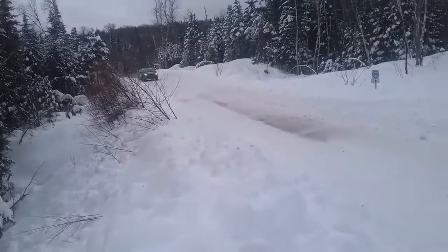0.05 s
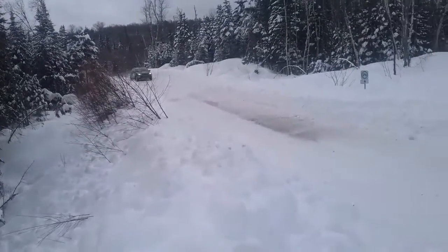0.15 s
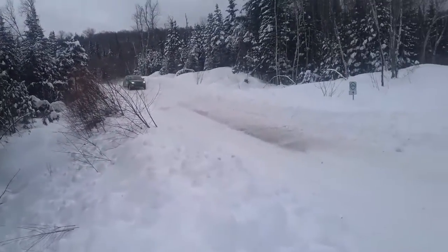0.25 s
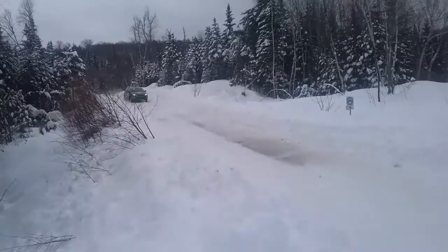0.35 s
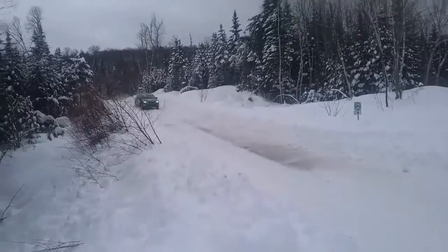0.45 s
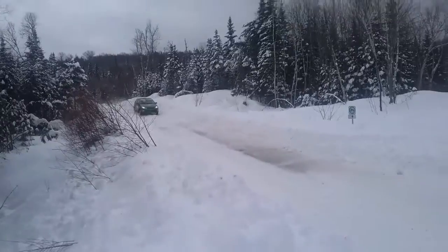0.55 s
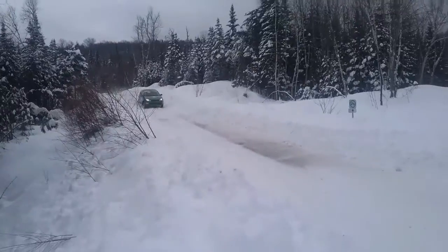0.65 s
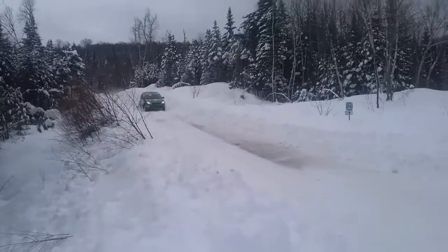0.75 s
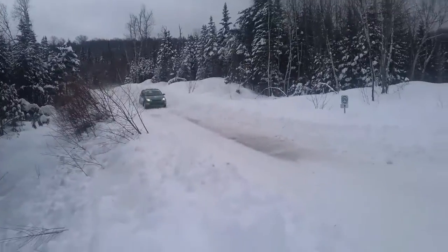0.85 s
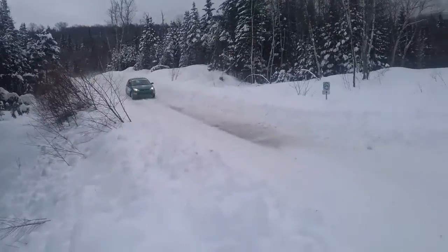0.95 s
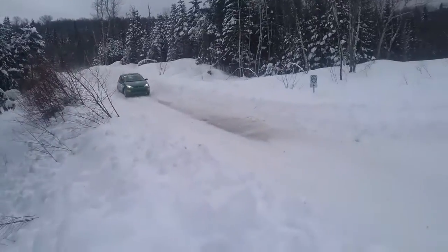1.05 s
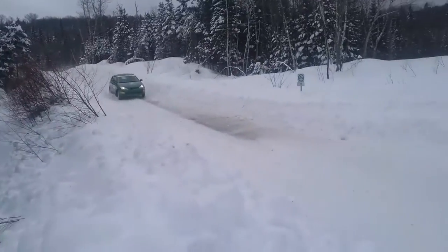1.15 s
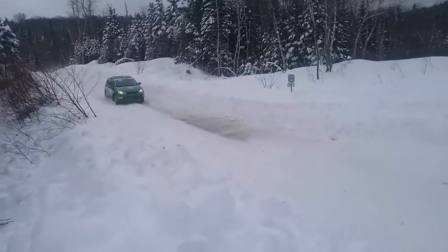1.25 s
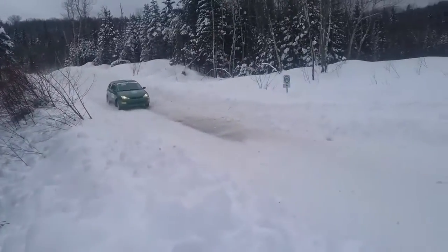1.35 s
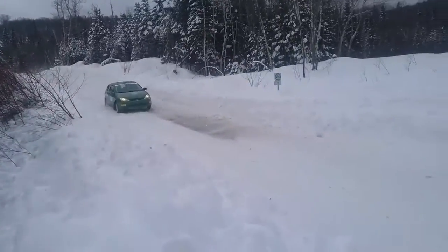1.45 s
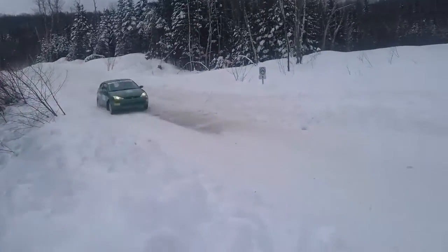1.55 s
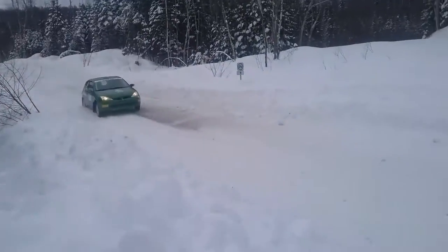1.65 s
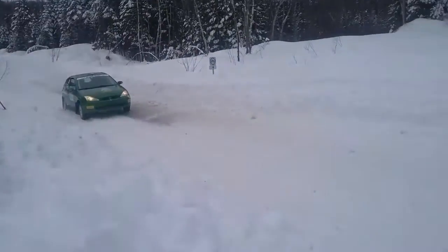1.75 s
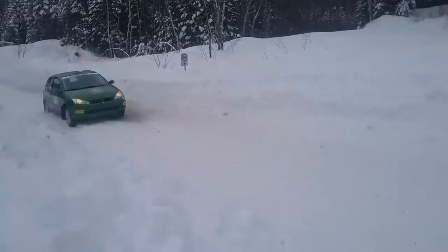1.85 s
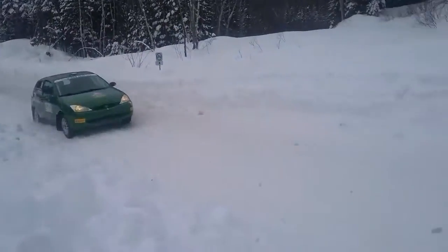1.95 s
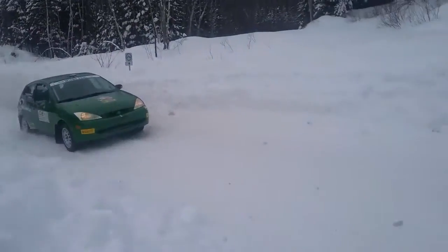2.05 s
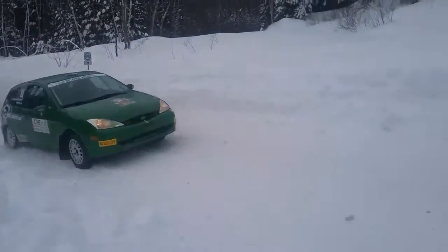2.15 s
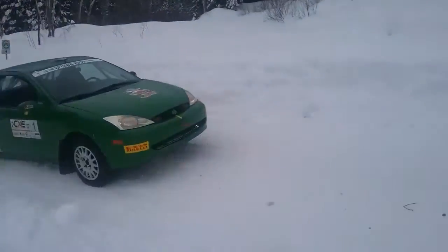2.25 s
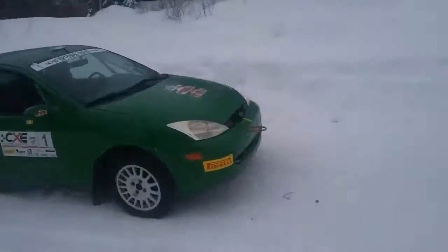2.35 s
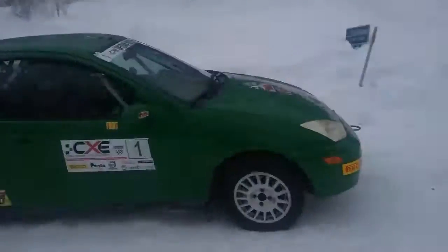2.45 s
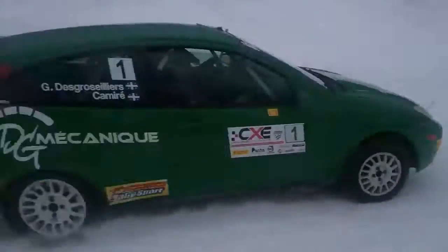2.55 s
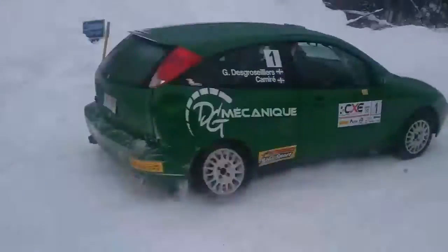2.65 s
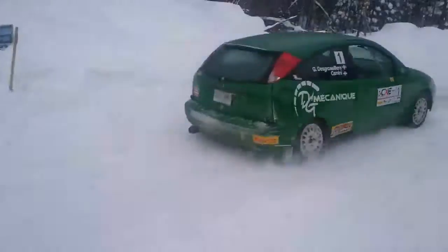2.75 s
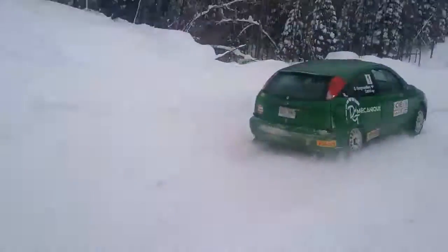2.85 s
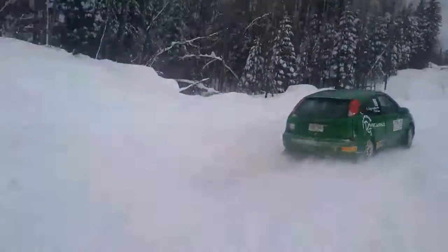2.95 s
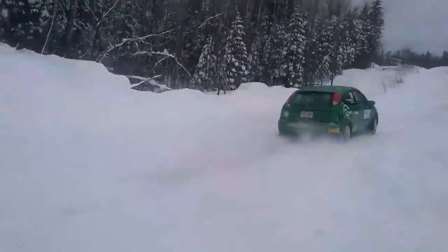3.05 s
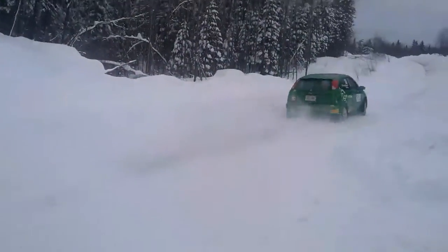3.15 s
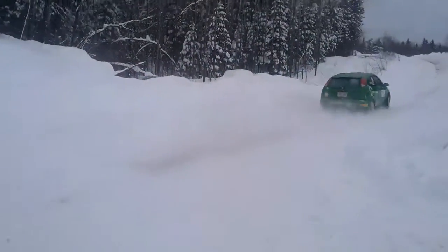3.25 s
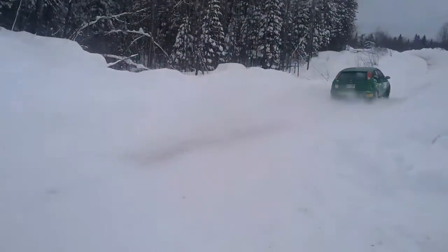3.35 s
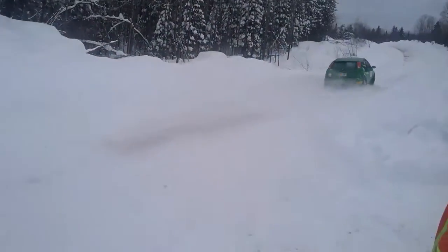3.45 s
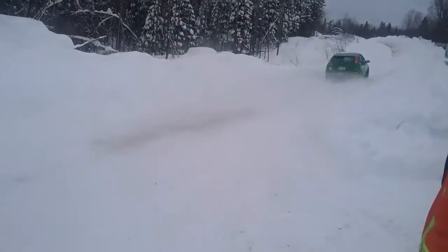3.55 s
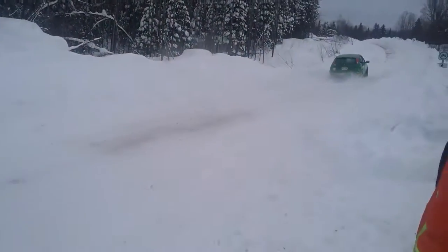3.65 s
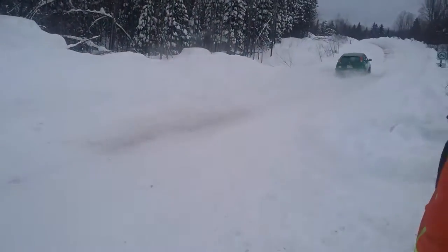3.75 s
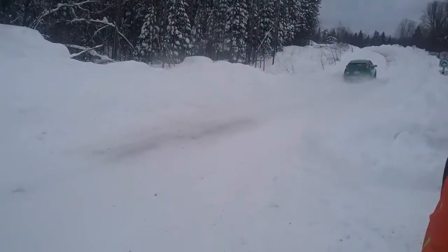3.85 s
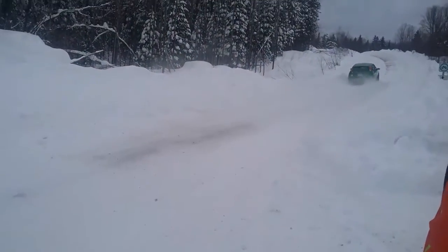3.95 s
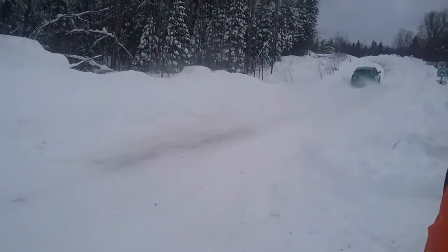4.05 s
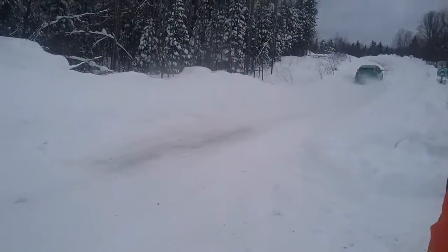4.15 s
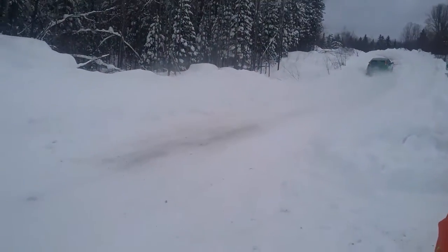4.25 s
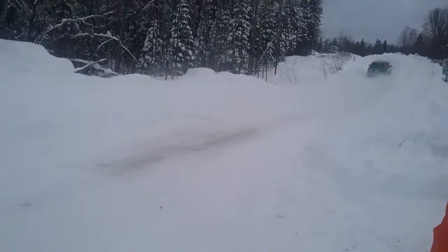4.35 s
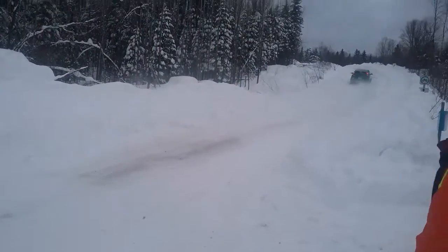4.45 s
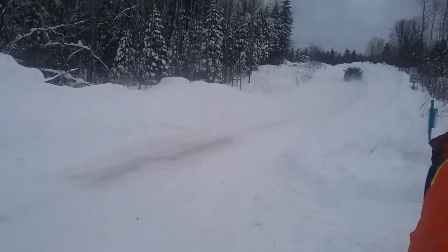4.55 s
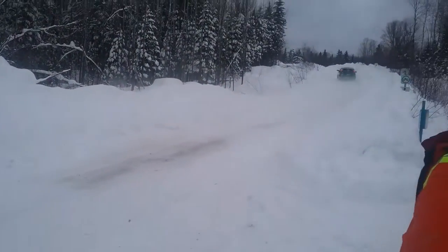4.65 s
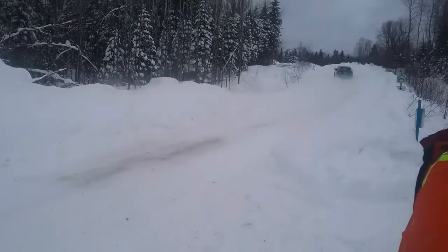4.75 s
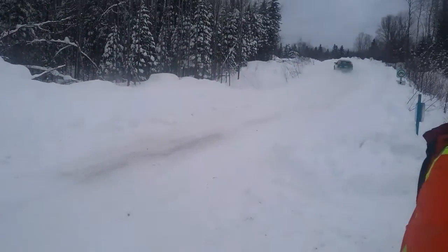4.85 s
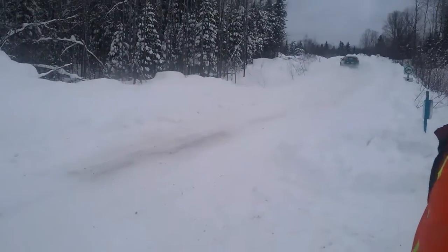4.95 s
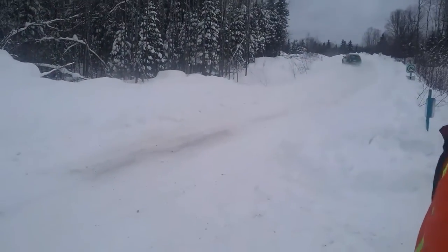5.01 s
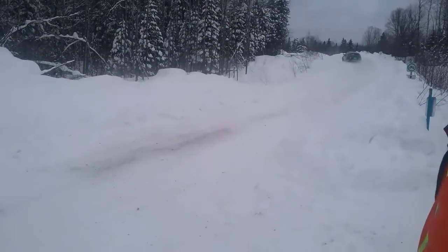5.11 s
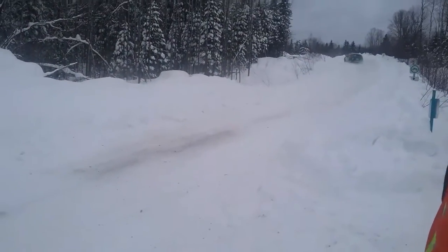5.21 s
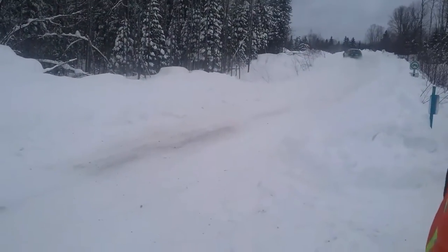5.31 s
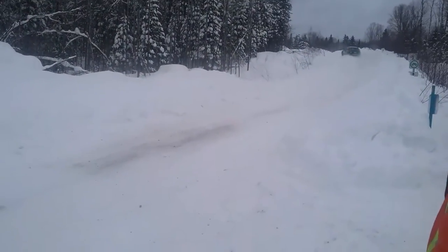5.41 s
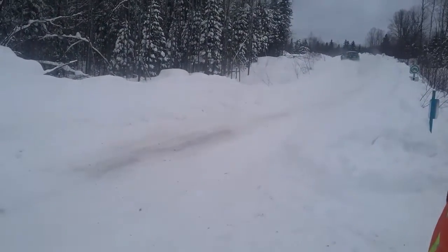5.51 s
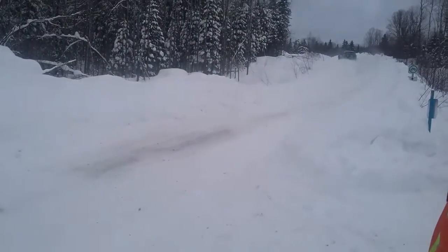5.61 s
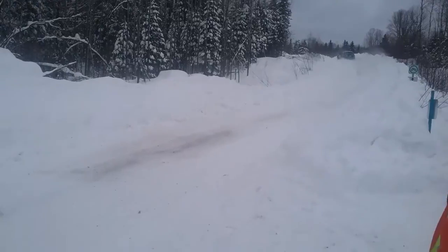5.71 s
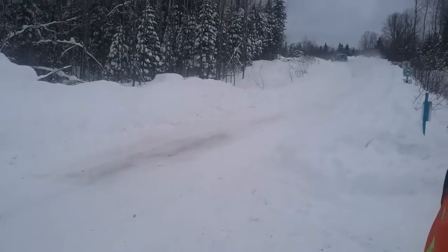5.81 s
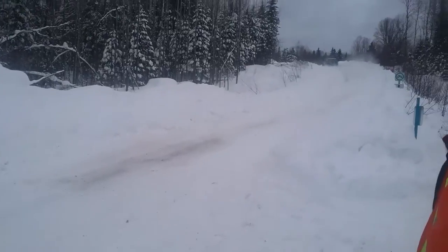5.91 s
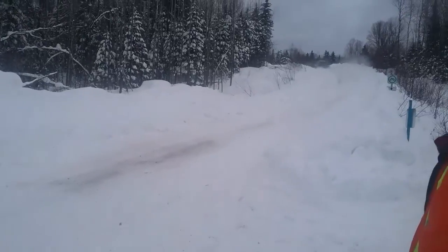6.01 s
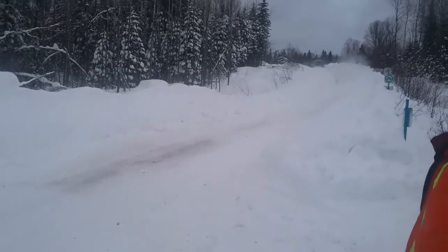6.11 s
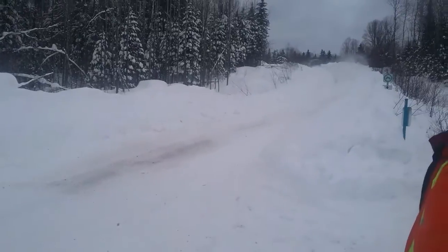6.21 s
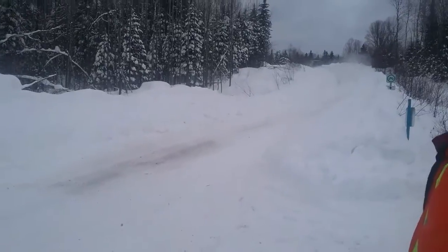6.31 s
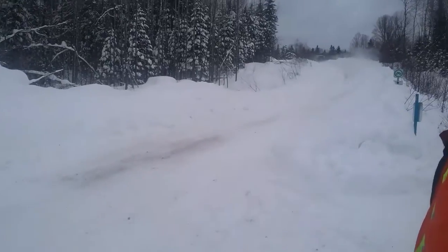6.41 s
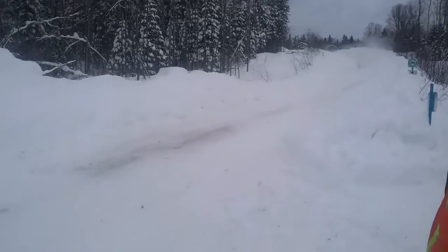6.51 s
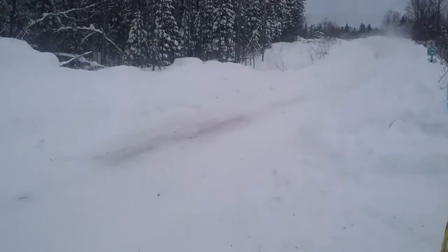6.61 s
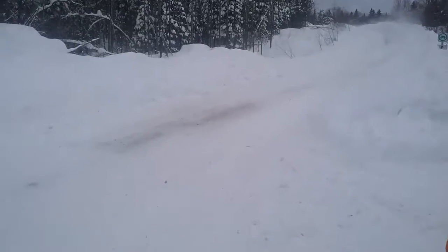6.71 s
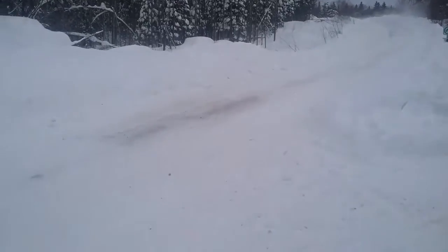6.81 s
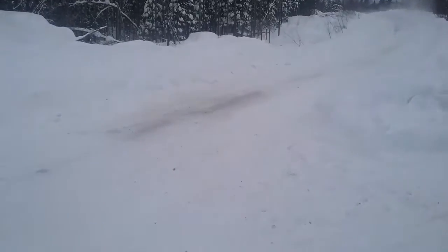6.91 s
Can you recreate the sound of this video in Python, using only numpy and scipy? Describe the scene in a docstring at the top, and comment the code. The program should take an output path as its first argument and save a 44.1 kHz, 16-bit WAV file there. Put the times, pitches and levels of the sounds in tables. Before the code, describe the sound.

A hard-revving rally engine grows from a steady drone to a loud close pass over snow, with hissing tyres, flung slush and low rumble. Its raspy exhaust then leads away down the road, thinning with distance; the throttle drops, opens again, drops and just begins to return. Faint forest air and a short echo from trees and banks, captured by a simple handheld mono microphone.

```python
"""A four-cylinder rally car comes flat out along a snowy forest road, its intake drone and churning tyres leading.
A tick with a dull thump falls early on; slush spatters just before the car passes a few metres away at about 2.6 s.
Then the exhaust barks and rasps, thin bright clicks crackle at its loudest, and the low rumble falls with the wake.
Far off the driver lifts, opens the throttle again, lifts once more and starts to open it at the very end.
Firing pulses ring through filters as exhaust, a swayed sine is the intake, shaped noise is snow, rumble and air."""
import sys
import numpy as np
from scipy import signal
from scipy.fft import rfft, irfft, next_fast_len
from scipy.io import wavfile
from scipy.ndimage import uniform_filter1d, map_coordinates

SR = 44100
rng = np.random.default_rng(int(sys.argv[2]) if len(sys.argv) > 2 else 0)


def store_pcm(level_fs):
    """Save levels as 16-bit WAV."""
    pcm = np.round(np.clip(level_fs, -1, 1) * 32767).astype(np.int16)
    wavfile.write(sys.argv[1], SR, np.atleast_2d(pcm).T)


N = 307377
TIME = np.arange(N) / SR


def from_db(db):
    """Decibels to gain."""
    return 10 ** (np.asarray(db) / 20)


def rms_one(x):
    """Scale to unit power."""
    return x / np.sqrt(np.mean(x ** 2) + 1e-20)


def in_time(rows):
    """Each column of a curve, interpolated at every sample."""
    time_s, *columns = np.transpose(rows)
    return [np.interp(TIME, time_s, column) for column in columns]


def drift(rate):
    """Smooth random wander of spread 1, with the given number of random knots per second."""
    knots = rng.standard_normal(8000)
    coarse_s = TIME[::16]
    wander = map_coordinates(knots, [coarse_s * rate + 5], order=3, mode="wrap")
    return rms_one(np.interp(TIME, coarse_s, wander))


def wavering(level_db, waver_db, per_s=14):
    """Gain that wavers a little as the car bucks and slews."""
    return from_db(level_db + waver_db * drift(per_s))


def white_noise():
    """Gaussian noise, equally strong at all pitches."""
    return rng.standard_normal(N)


def coloured(x, spectrum, size=4096):
    """Causal (minimum-phase) filter with the given spectrum: its peaks ring after each pulse."""
    hz, db = np.transpose(spectrum)
    grid_hz = np.maximum(np.fft.rfftfreq(size, 1 / SR), 1)
    gain = from_db(np.interp(np.log(grid_hz), np.log(hz), db))
    # folding the cepstrum onto positive time makes the filter minimum-phase
    cepstrum = irfft(np.log(gain))
    cepstrum[1:size // 2] *= 2
    cepstrum[size // 2 + 1:] = 0
    impulse_response = irfft(np.exp(rfft(cepstrum)))
    return signal.fftconvolve(x, impulse_response)[:N]


def band(x, low_hz, high_hz, order=24):
    """A steep zero-phase band; bands that share an edge add up to the whole."""
    size = next_fast_len(N + 4096)
    hz = np.fft.rfftfreq(size, 1 / SR)
    below_high = 1 / (1 + (hz / high_hz) ** order)
    below_low = 1 / (1 + (hz / low_hz) ** order)
    return irfft(rfft(x, size) * (below_high - below_low), size)[:N]


def high_passed(x, order, low_hz):
    """Keep what lies above low_hz."""
    return signal.sosfilt(signal.butter(order, low_hz, "high", fs=SR, output="sos"), x)


def evened(x, size=2200):
    """Hold the running power at 1 over windows of size samples."""
    return x / np.sqrt(np.maximum(uniform_filter1d(x ** 2, size), 1e-14))


def clicks_at(events):
    """One click of the given height for each event."""
    clicks = np.zeros(N)
    for start_s, db in events:
        clicks[round(start_s * SR)] = from_db(db)
    return clicks


# how hard the engine works, before each part takes its share: time_s, throttle_db
THROTTLE = [(0, -6.5), (.42, -4.4), (1.2, -3), (1.94, .3), (3.53, -.6), (3.89, -6), (4.23, -10),
            (4.47, -16.5), (4.81, -29.5), (4.88, -3.5), (5.08, 1.9), (5.88, 1.5), (6.31, -5.6),
            (6.59, -19.3), (6.76, -26.6), (6.89, -24), (6.97, -8)]
# how each part follows distance, heading and throttle; name: abeam_db (before throttle and swells),
# loss_db per doubling of distance, rear_db (gain to the rear, loss ahead), throttle_share,
# smoothing_s (averaging of the throttle), abeam_s (moment of passing).
# "snow" is relative to the hiss, "echo" to the direct sound, "uneven" scales the firing differences
PARTS = {"drone": (-7.3, 5.5, -3.4, .88, .02, 2.62), "octave": (-27.8, 1.6, 1.9, 1.0, .02, 2.25),
         "bark": (-16.6, 3.3, 2.5, 1.02, .2, 2.6), "rasp": (-22.0, 3.1, -.6, 1.27, .01, 2.72),
         "hiss": (-18.4, 6.3, 1.0, 1.23, .01, 2.74), "rumble": (-32.0, 5.7, -.5, .1, .02, 2.3),
         "snow": (-9.6, -2.5, -4.5, -.2, .02, 2.68), "echo": (-21.0, -5.2, -8.0, -.15, .02, 2.6),
         "uneven": (-2.4, .1, -3.3, .02, .02, 2.45)}
# bell-shaped swells and dips of single parts; name: centre_s, half_length_s, swell_db
SWELLS = {"drone": [(1.38, .036, -8), (1.56, .035, -6), (1.66, .13, -12.5), (2.37, .06, 3),
          (2.5, .02, -6.8), (2.74, .09, -6.6), (4.99, .075, 4.3), (5.95, .37, -7)],
          "octave": [(1.6, .44, -7), (2.42, .015, -12), (2.55, .11, 11), (2.84, .03, -12), (2.93, .05, 7),
          (6.53, .16, 11.4)], "bark": [(1.45, .08, 5.5), (1.76, .11, -4.5), (2.11, .13, 4.2),
          (2.41, .025, -6), (2.72, .035, -5.8), (3.35, .17, 2), (3.92, .1, -3), (4.66, .1, 8.5),
          (6.15, .13, 2.5), (6.52, .08, -4)], "rasp": [(2.55, .08, -3), (2.88, .025, -6), (3.26, .03, -3),
          (3.9, .047, -6), (4.0, .025, 3), (4.24, .04, 3), (4.58, .18, 10.4), (5.9, .2, 2), (6.9, .12, -6),
          (4.88, .025, 4)], "hiss": [(2.58, .045, -8), (2.81, .05, 2.5), (3.28, .03, -3), (3.35, .015, 3),
          (3.43, .025, -3), (3.5, .026, 4.5), (3.94, .015, 4), (4.15, .12, 2), (4.62, .12, -9),
          (4.82, .02, -7), (6.55, .2, -5.5)], "rumble": [(2.8, .05, 8), (3.09, .04, 10), (5.03, .05, 15),
          (6.3, .04, 13)], "snow": [(3.3, .5, -3.5), (4.9, .05, -3), (5.5, .35, 2)],
          "echo": [(3.35, .45, -10), (4.9, .05, -15), (5.15, .15, 4)], "uneven": [(1.2, .1, 2),
          (1.43, .06, -4), (1.75, .2, 2), (2.62, .05, -4), (3.5, .4, -1.5), (5.25, .25, -3)]}
SPEED_M_PER_S, CLOSEST_M = 20.0, 4.0   # a straight run past the listener


def level_of(part):
    """Level in dB of one part as the car drives past: distance, heading, throttle and swells add up."""
    abeam_db, loss_db, rear_db, throttle_share, smoothing_s, abeam_s = PARTS[part]
    coarse_s = TIME[::64]
    along_m = SPEED_M_PER_S * (coarse_s - abeam_s)
    distance_m = np.hypot(along_m, CLOSEST_M)
    heading_db = rear_db * along_m / distance_m
    distance_db = -loss_db * np.log2(distance_m / CLOSEST_M)
    throttle_db = np.interp(coarse_s, *np.transpose(THROTTLE))
    throttle_db = uniform_filter1d(throttle_db, size=1 + int(smoothing_s / coarse_s[1]))
    swell_db = sum(db * np.exp(-.5 * ((coarse_s - centre_s) / half_length_s) ** 2)
                   for centre_s, half_length_s, db in SWELLS[part])
    level_db = abeam_db + heading_db + distance_db + throttle_share * throttle_db + swell_db
    return np.interp(TIME, coarse_s, level_db)


# still forest: pitch_hz, relative_db
AIR_COLOUR = [(25, -32), (90, -12), (300, -4), (600, -7.5), (1100, -13.5), (3000, -24), (7000, -37),
              (15000, -20.5)]


def forest_air(level_db=-58):
    """The still forest: a faint, steady bed of shaped noise."""
    return from_db(level_db) * rms_one(coloured(white_noise(), AIR_COLOUR))


# tick and thump: start_s, relative_db
TICKS = [(0.4347, -37.5)]


def tick_and_thump(tick_db=16, thump_db=58, thump_hz=160):
    """A tiny click, and the same click through a low band as a dull thump."""
    clicks = clicks_at(TICKS)
    low_band = signal.butter(1, [thump_hz / 2, thump_hz], "band", fs=SR, output="sos")
    thump = signal.sosfilt(low_band, clicks + 1e-18)
    return from_db(tick_db) * clicks + from_db(thump_db) * thump


# wheels over ruts: pitch_hz, relative_db
RUMBLE_COLOUR = [(20, -39.5), (40, -17.5), (60, -4), (82, -1.5), (120, -10.5), (200, -12), (500, -40),
                 (2000, -81)]
WAKE_ENDS_S, WAKE_FADE_S, WAKE_DROP_DB = 3.15, .025, 11   # the rumble falls away once the wake has gone by


def rumble(firing_hz, lump_db=2.0, throb_db=-7):
    """Wheels thud over ruts as low noise; the crankshaft adds a throb at half the firing rate."""
    throb = np.sqrt(2) * np.sin(np.pi * np.cumsum(firing_hz) / SR + drift(12))
    thuds = rms_one(coloured(white_noise(), RUMBLE_COLOUR))
    wake_gone = .5 + .5 * np.tanh((TIME - WAKE_ENDS_S) / WAKE_FADE_S)
    level_db = level_of("rumble") - WAKE_DROP_DB * wake_gone + lump_db * drift(18)
    return from_db(level_db) * (thuds + from_db(throb_db) * throb)


# tyres in snow: pitch_hz, relative_db per Hz
SNOW_COLOUR = [(60, -11.5), (130, 8), (280, 3), (600, 12), (900, 9), (1500, 6), (2300, 5.5), (3500, 1.5),
               (5500, -1), (9000, -5), (15000, -2)]


def tyres(level_db, grains_per_s=900, grain_db=-6, churn_db=0.84):
    """Studded treads churn the snow as noise and fling icy grains, random clicks, at the wheel arches."""
    chance = grains_per_s * from_db(4 * drift(25)) / SR
    born = rng.random(N) < chance
    heavy_db = 1.5 * np.minimum(rng.exponential(1, N), 4)   # a few grains hit much harder
    grains = born * white_noise() * from_db(heavy_db)
    spray = coloured(white_noise() + from_db(grain_db) * rms_one(grains), SNOW_COLOUR)
    hiss_rms = np.std(band(spray, 3200, 7500))   # the level refers to this band
    return from_db(level_db + churn_db * drift(45)) * spray / hiss_rms


# slush flung by the wheels as they go by: centre_s, level_db, half_length_s
SLUSH = [(2.254, -16, 0.012), (2.39, -18, .009), (2.425, -19.5, 0.021), (2.498, -15, 0.02)]
# its colour: pitch_hz, relative_db per Hz
SLUSH_COLOUR = [(300, -16), (2000, -8), (5500, -4.5), (9000, 1), (15000, 0.5)]


def slush(clump_db=2.0):
    """Thrown snow: short, bright bursts of noise, made clumpy by a fast wander in level."""
    swell = sum(from_db(level_db) * np.exp(-.5 * ((TIME - centre_s) / half_length_s) ** 2)
                for centre_s, level_db, half_length_s in SLUSH)
    clumps = white_noise() * from_db(clump_db * drift(500))
    return swell * rms_one(coloured(clumps, SLUSH_COLOUR))


def forest_echo(x, t60_s=0.41, first_s=.004):
    """Trunks and snow banks scatter a short dense echo: convolution with decaying noise."""
    tail_s = TIME[:SR // 2]
    echo = rng.standard_normal(len(tail_s)) * from_db(-60 * tail_s / t60_s) * (tail_s > first_s)
    return signal.fftconvolve(x, echo / np.sqrt(np.sum(echo ** 2)))[:N]


# overload crackle while the car is loudest: start_s, relative_db
CRACKLES = [(2.915, 1), (2.941, -3), (2.946, 0), (2.9943, -2), (3.0066, 4), (3.013, 1), (3.0595, -1)]


def overload_crackle(gain_db=22.5, low_hz=8000):
    """Thin, bright clicks placed by the table, with only their top treble kept, as of an overdriven input."""
    return from_db(gain_db) * high_passed(clicks_at(CRACKLES), 4, low_hz)


# engine speed as heard; it flares as the wheels slip and drops as the car goes by: time_s, firings_per_s
REVS = [(0.0, 140.0), (0.13, 144.2), (0.25, 141.3), (0.39, 146.2), (0.62, 150.5), (0.79, 152.1),
        (0.85, 155.4), (0.93, 155.7), (1.03, 153.2), (1.16, 159.1), (1.3, 158.2), (1.36, 167.1),
        (1.4, 169.1), (1.46, 163.0), (1.49, 163.9), (1.53, 167.4), (1.76, 170.3), (1.82, 168.8),
        (2.27, 173.8), (2.31, 172.5), (2.45, 175.9), (2.52, 169.9), (2.58, 169.9), (2.64, 173.7),
        (2.68, 173.8), (2.77, 160.9), (2.91, 159.1), (3.11, 171.4), (3.2, 166.5), (3.67, 161.7),
        (3.71, 158.4), (3.78, 158.0), (4.04, 159.9), (4.21, 157.8), (4.29, 150.8), (4.5, 146.4),
        (4.76, 137.7), (5.3, 149.7), (5.49, 147.0), (5.61, 150.3), (6.0, 140.3), (6.19, 138.5),
        (6.76, 129.3), (6.97, 128.6)]


def revs(slip=.0016, slips_per_s=24):
    """Firing rate, trembling around its curve as the tyres grip and slip."""
    firing_hz, = in_time(REVS)
    return firing_hz * (1 + slip * drift(slips_per_s))


def intake(cycles, uneven_db, sway=.24, wander_db=2.0, flutter_db=0.47):
    """The firing tone, a sine; unequal cylinders sway its phase once in every four firings."""
    depth = sway * from_db(uneven_db + wander_db * drift(16))
    ripple = depth * np.sin(np.pi / 2 * cycles + drift(10))
    tone = np.sin(2 * np.pi * cycles + ripple)
    return -from_db(flutter_db * drift(40)) * tone


# four cylinders, never quite equal, before the "uneven" part scales them: strength_db, late_ms
CYLINDERS = [(-2.8, 0.044), (-7.2, -0.043), (-4.9, -0.082), (-4.5, 0.012)]


def firings(cycles, uneven, scatter_db=1.2, jitter_ms=.035):
    """One sharp pressure pulse each time an exhaust valve opens."""
    count = np.arange(1, int(cycles[-1]))
    at = np.interp(count, cycles, np.arange(N))
    chance = rng.standard_normal((len(count), 2))
    strength_db, late_ms = np.array(CYLINDERS)[count % len(CYLINDERS)].T
    spread = uneven[at.astype(int)]
    height = from_db(spread * (strength_db + scatter_db * chance[:, 0]))
    late = spread * (late_ms + jitter_ms * chance[:, 1])
    at = np.clip(at + late * SR / 1000, 0, N - 2)
    # a pulse between two samples is shared by both
    pulses, whole = np.zeros(N), at.astype(int)
    pulses[whole] = height * (1 - at % 1)
    pulses[whole + 1] = height * (at % 1)
    return pulses


def gas_jet(pulses, puff_s=0.0011, onset_hz=3500):
    """Each pulse drives a short turbulent puff of noise out of the pipe, mostly treble."""
    gate = signal.lfilter([1], [1, -np.exp(-1 / (puff_s * SR))], pulses)
    return high_passed(rms_one(gate * white_noise()), 1, onset_hz)


# silencer cavities that hold parts of each pulse back: pitch_hz, width_hz
CAVITIES = [(1100, 3600), (4000, 900), (6100, 1700)]


def dispersed(x):
    """All-pass cavities smear each pulse into a short chirp."""
    for pitch_hz, width_hz in CAVITIES:
        radius = np.exp(-np.pi * width_hz / SR)
        poles = [1, -2 * radius * np.cos(2 * np.pi * pitch_hz / SR), radius * radius]
        x = signal.lfilter(poles[::-1], poles, x)
    return x


# bounce off the car's body as the tail swings round: time_s, lag_ms (before the slewing wander), strength
BOUNCE = [(0, 0.07, .1), (2.5, 0.043, 0.6), (2.7, 0.19, 0.16), (2.85, 0.16, 0.56), (3.0, 0.34, 0.2),
          (3.2, .39, .5), (3.7, 0.44, 0.27), (6.97, 0.49, .35)]
# later return from the snow bank: time_s, lag_ms (before the slewing wander), strength
BANK = [(0, 1.72, 0.27), (2.4, 2.32, 0.082), (3.0, 2.2, .15), (3.8, 2.05, 0.6), (4.4, 2.05, 0.2),
        (5.0, 2, 0.37), (5.9, 1.78, 0.36), (6.97, 2.04, 0.42)]


def bounced(x, slew=0.076):
    """Direct sound plus reflections off body and bank: comb notches that shift as the car slews."""
    out = x
    for path in (BOUNCE, BANK):
        lag_ms, strength = in_time(path)
        lag_ms = lag_ms * (1 + slew * drift(7))
        out = out + strength * np.interp(TIME - lag_ms / 1000, TIME, x)
    return out


# exhaust colour from ahead, abeam and close behind, each: pitch_hz, relative_db
AHEAD = [(200, -10), (320, 2), (440, 1), (640, 7.5), (790, 3.5), (1050, -7), (1200, -14), (1380, -10.5),
         (1700, -14.5), (2000, -17), (2500, -26), (4000, -37.5), (15000, -22.5)]
ABEAM = [(200, -3.5), (480, -5), (660, -1), (830, -11), (1100, -13.5), (1420, -10), (1620, -10.5),
         (2050, -10.5), (2550, -14), (3500, -15), (4100, -12), (4600, -16.5), (6400, -15.5), (15000, -14.5)]
BEHIND = [(200, -13.5), (330, -15), (490, -9), (655, 3.5), (820, -10.5), (990, -13), (1280, -26.5),
          (1650, -18.5), (2050, -17.5), (2900, -23.5), (3700, -29.5), (4600, -26), (6000, -28.5),
          (15000, -28.5)]
# two far-off exhaust colours, one thinner, one fuller near 1 and 1.5 kHz, each: pitch_hz, relative_db
FAR_THIN = [(200, -22.5), (290, -20.5), (440, -6), (580, 0), (720, -7), (870, -14.5), (1150, -27.5),
            (1450, -12.5), (1700, -18.5), (2080, -12), (2450, -28.5), (2800, -22), (3700, -37),
            (15000, -52)]
FAR_FULL = [(200, -13.5), (290, -10), (440, -5.5), (590, 1.5), (750, 0), (870, -15), (1030, -10.5),
            (1180, -15), (1490, -7.5), (1750, -18.5), (2060, -16.5), (2800, -23), (3600, -22.5),
            (15000, -30.5)]
# which colour is heard, with crossfades in between:
# time_s, view (0 ahead, 1 abeam, 2 behind, 3 far and thin, 4 far and full)
ASPECT = [(0, 0), (2.4, 0), (2.66, 1), (2.86, 1), (3.02, 2), (3.8, 2), (4.3, 3), (4.75, 3.5), (4.9, 4),
          (5.55, 4), (5.9, 3), (6.27, 3), (6.4, 3.9), (6.97, 3.9)]


def exhaust(cycles, echo_db, uneven_db, jet_db=-1, treble_echo_db=0, echo_gain_db=-3):
    """Pulses and puffs ring in the pipe; a timed table crossfades between five colours."""
    pulses = rms_one(firings(cycles, from_db(uneven_db)))
    puffs = from_db(jet_db + uneven_db) * gas_jet(pulses)
    source = bounced(dispersed(pulses + puffs))
    # the echo leaves out the lowest part of the pulses
    scattered = band(source, 200, 1200) + from_db(treble_echo_db) * band(source, 1100, 20000)
    source = source + from_db(echo_db + echo_gain_db) * forest_echo(scattered)
    aspect, = in_time(ASPECT)
    pipe = np.zeros(N)
    for number, view in enumerate([AHEAD, ABEAM, BEHIND, FAR_THIN, FAR_FULL]):
        share = np.maximum(1 - abs(aspect - number), 0)
        pipe = pipe + share * coloured(source, view)
    return pipe


def engine(firing_hz, hiss_db, snow_db):
    """Drone, bark, rasp and sizzle, all locked to the firings; spraying snow veils the upper ones."""
    cycles = np.cumsum(firing_hz) / SR
    uneven_db = level_of("uneven")
    pipe = exhaust(cycles, level_of("echo"), uneven_db)
    snow_share = np.clip(from_db(snow_db) ** 2, 0, .97)   # share of the power
    rasp_veil = np.sqrt(np.maximum(1 - 0.64 * snow_share, 0))
    sizzle_veil = np.sqrt(1 - snow_share)
    drone = wavering(level_of("drone"), waver_db=.6) * intake(cycles, uneven_db)
    octave = wavering(level_of("octave"), waver_db=1.0) * evened(band(pipe, 220, 334))
    bark = wavering(level_of("bark"), waver_db=.8) * evened(band(pipe, 370, 1197))
    rasp = wavering(level_of("rasp"), waver_db=.8) * rasp_veil * evened(band(pipe, 1110, 3320))
    sizzle = wavering(hiss_db, waver_db=.8) * sizzle_veil * evened(band(pipe, 3160, 18000))
    return drone + octave + bark + rasp + sizzle


def scene():
    """The car and the quiet forest, the same in both channels."""
    firing_hz = revs()
    hiss_db = level_of("hiss")
    snow_db = np.minimum(level_of("snow"), 0)
    background = forest_air() + tick_and_thump()
    road = rumble(firing_hz) + tyres(hiss_db + snow_db) + slush()
    car = engine(firing_hz, hiss_db, snow_db)
    return np.tile(background + road + overload_crackle() + car, (2, 1))


# a small microphone that peaks near 6 kHz and is dull above: pitch_hz, gain_db
MICROPHONE = [(100, 1), (5200, 1), (6300, 7.5), (6750, 1), (7200, -6), (8000, -13), (10500, -20),
              (15000, -17)]
CUTOFF_HZ = 15800


def record(dry, knee=.96):
    """A mono microphone colours the treble; the highest peaks are rounded and the top is cut."""
    heard = coloured(dry[0], MICROPHONE)
    rounded = heard / (1 + (heard / knee) ** 10) ** (1 / 10)
    top_cut = signal.ellip(10, .1, 80, CUTOFF_HZ, fs=SR, output="sos")
    return np.tile(signal.sosfilt(top_cut, rounded), (2, 1))


dry = scene()
out = record(dry)
store_pcm(out)
```